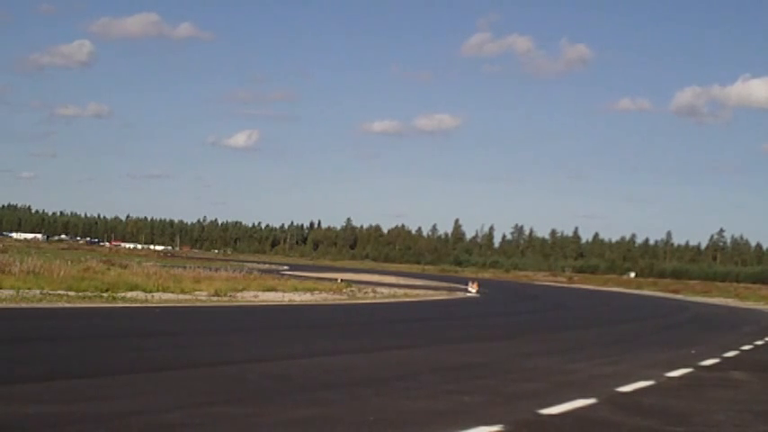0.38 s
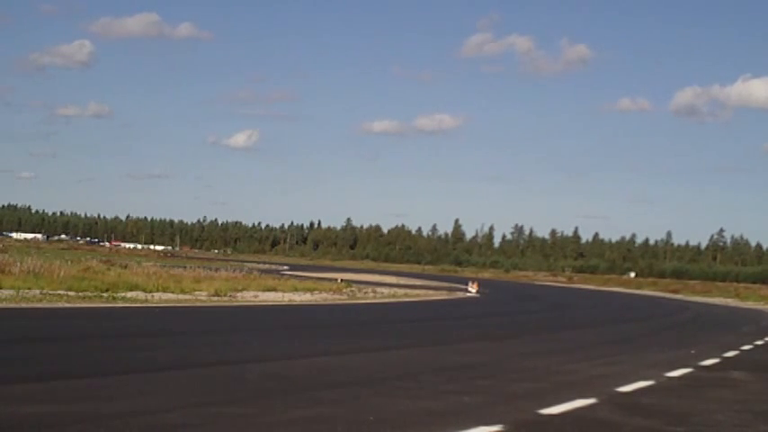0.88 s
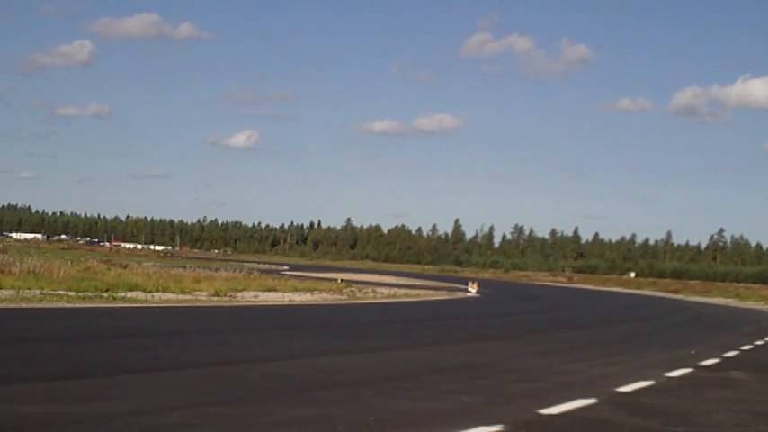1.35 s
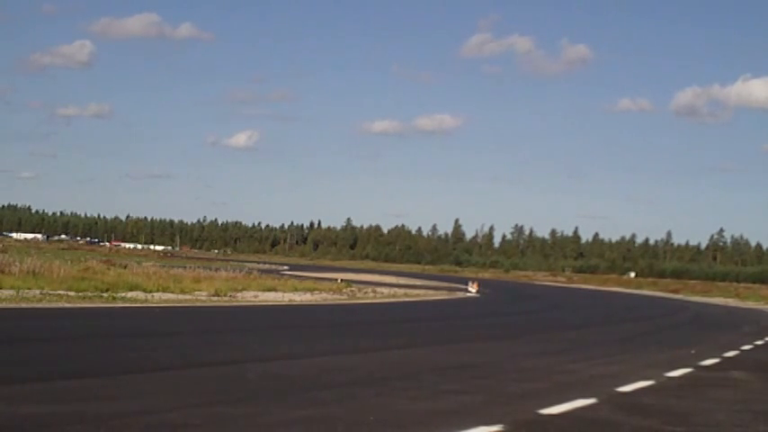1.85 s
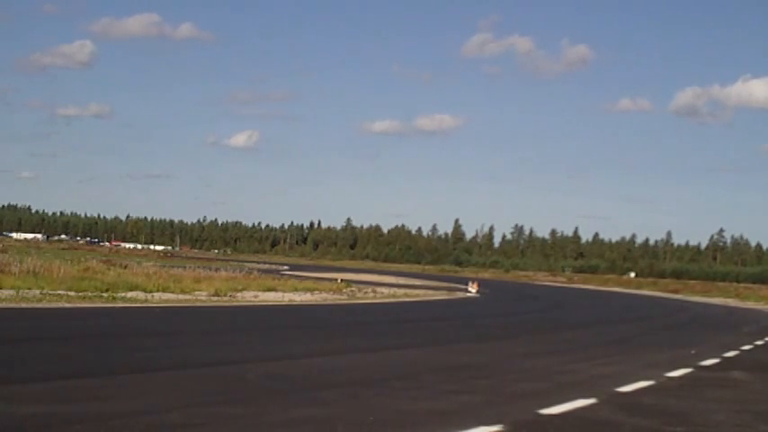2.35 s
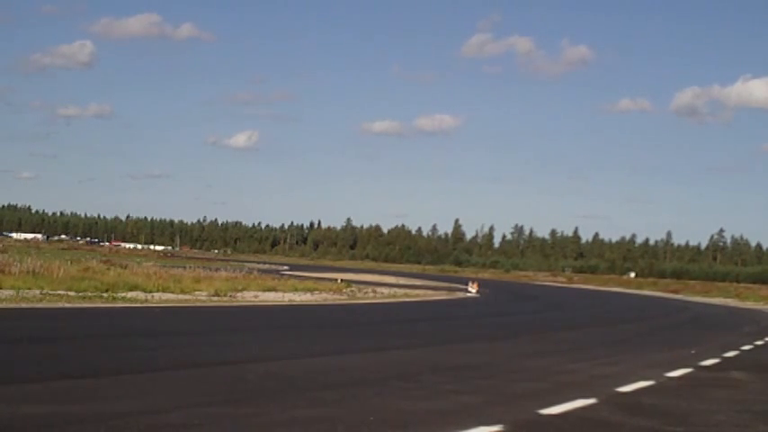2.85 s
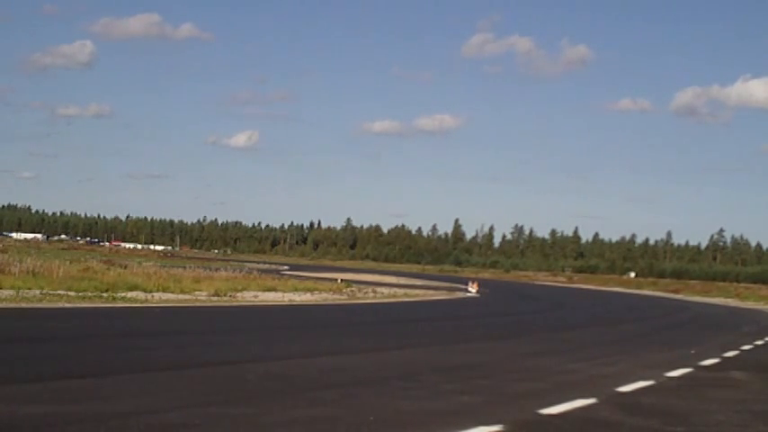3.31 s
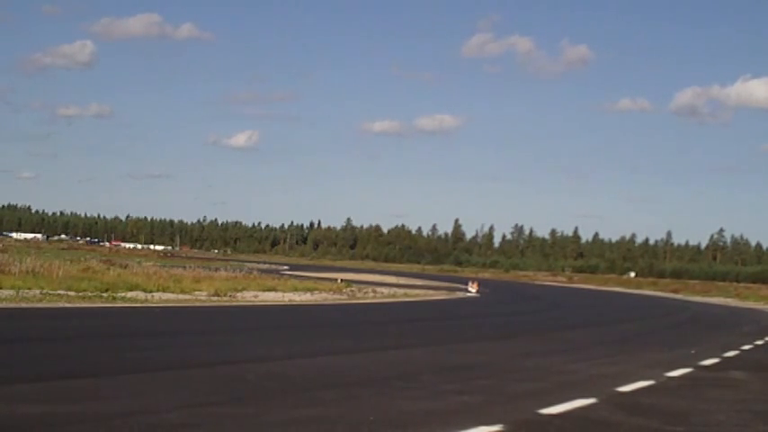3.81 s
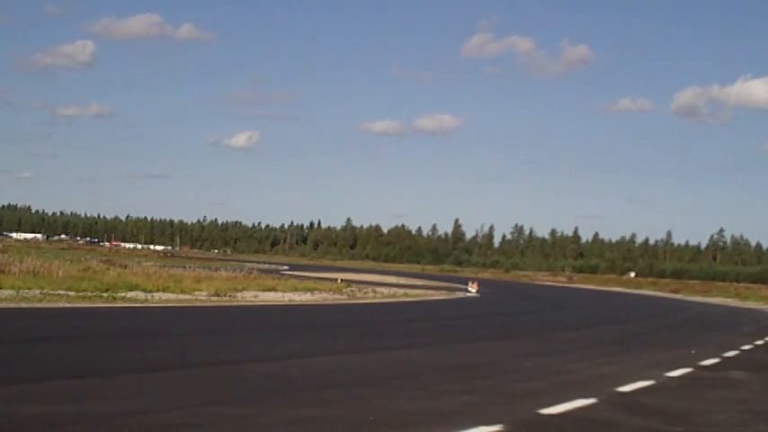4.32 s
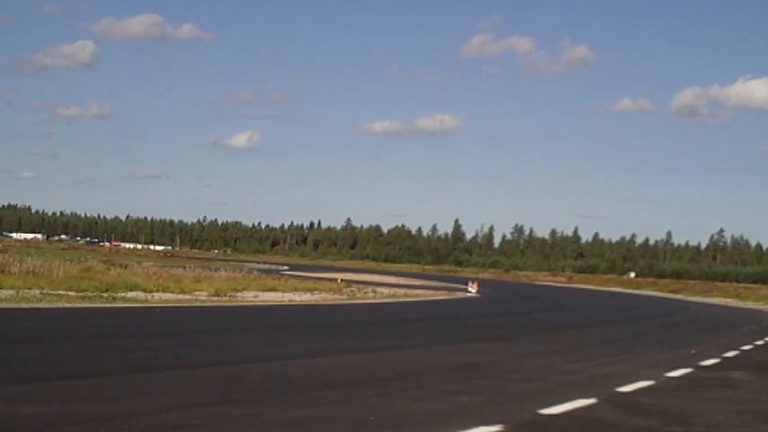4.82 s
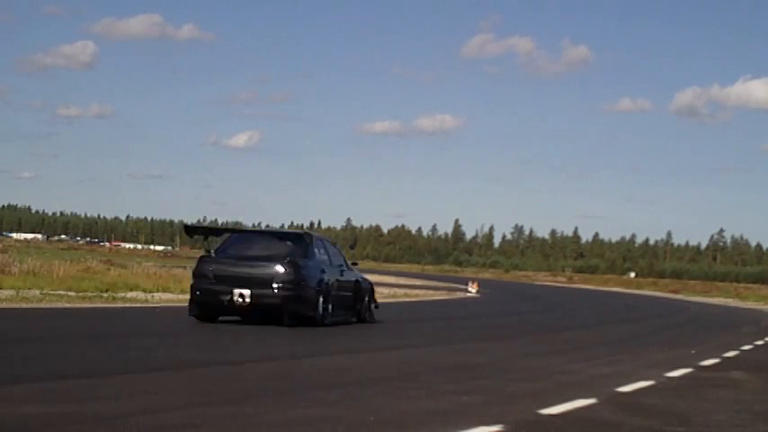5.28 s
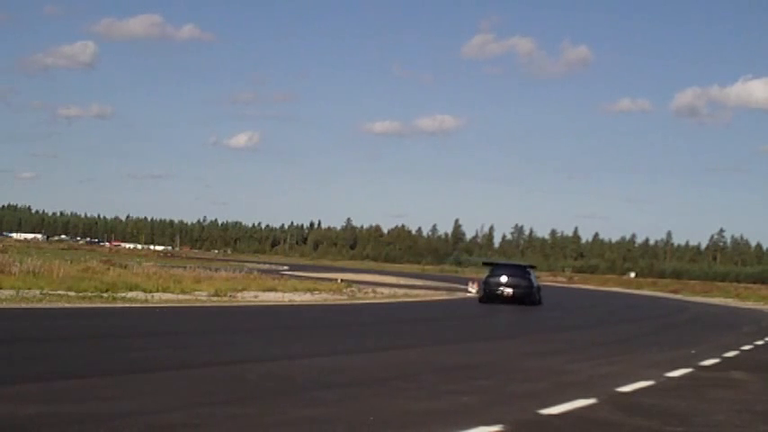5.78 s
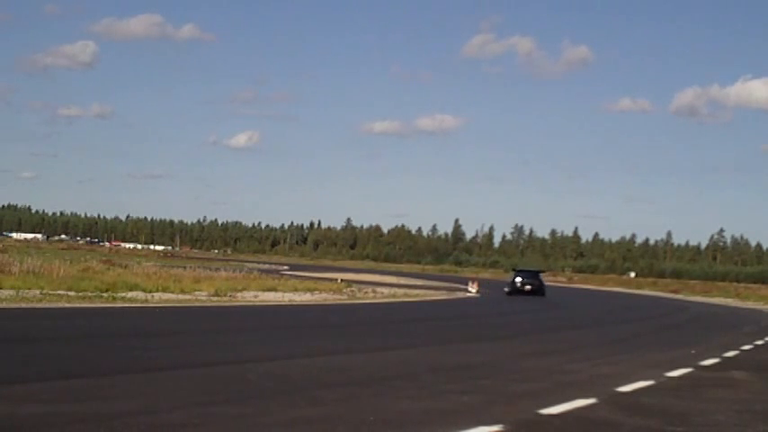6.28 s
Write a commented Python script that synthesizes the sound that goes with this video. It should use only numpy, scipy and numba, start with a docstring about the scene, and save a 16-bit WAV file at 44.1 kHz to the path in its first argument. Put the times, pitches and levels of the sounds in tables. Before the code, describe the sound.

Faint low background in open air, one fixed small microphone. Distant slide: soft exhaust pops and a wavering squeal. Then a turbocharged engine swells, changes up with a pop, releases a chuffing flutter off the throttle, and sweeps by as a distorted whoosh of tyres and air. The departing engine sounds lower and raspier, with sharp cracks, and fades steadily.

```python
"""Turbocharged race car passing a trackside spot

Far off another car slides and pops: resonant noise bursts, narrow squeals and coloured noise.
A four-cylinder car then pulls, shifts up, lifts with a fluttering valve, sweeps past and drives away with
bright crackles: sines at orders of a firing rate that falls by Doppler shift, with filtered noise for
exhaust, tyres and air. A small microphone overloads as the car passes."""
import sys
import numpy as np
from scipy import signal
from scipy.fft import rfft, irfft, next_fast_len
from scipy.io import wavfile
from scipy.ndimage import uniform_filter1d
from numba import njit

SR = 44100
rng = np.random.default_rng(int(sys.argv[2]) if len(sys.argv) > 2 else 0)


def volts(x):
    """Linear amplitude factor 10**(x/20) for a level x in dB, scalar or array-like."""
    e = np.asarray(x, float) / 20
    return 10 ** e


def output_pcm(signal):
    """Save a mono or channel-first signal as 16-bit PCM at the path in sys.argv[1].

    Samples are clipped to [-1, 1] before scaling.
    """
    pcm = np.clip(np.atleast_2d(signal).T, -1, 1) * 32767
    wavfile.write(sys.argv[1], SR, np.round(pcm).astype(np.int16))


N = 293265

PASSING_S, TURN_S = 4.93, 0.011            # the car goes by
LIFT_S, LIFT_TAKES_S = 3.76, 0.015         # the throttle closes
TAILPIPE_S, TAILPIPE_TAKES_S = 4.76, 0.03  # the tailpipe comes into earshot


def rms_one(x):
    """Normalisation: scale to an rms of 1."""
    return x / np.sqrt(np.mean(x ** 2) + 1e-20)


def in_time(rows):
    """Linear interpolation: the columns of a timed table, read at every sample."""
    s, *columns = np.transpose(rows)
    return [np.interp(np.arange(N) / SR, s, column) for column in columns]


def drift(rate_hz):
    """Low-passed white noise: slow wander of rms 1, smoothed by a double pole at rate_hz."""
    hop = 40  # samples between control points
    r = np.exp(-2 * np.pi * hop * rate_hz / SR)
    settle = 2000
    noise = rng.standard_normal(N // hop + settle + 2)
    slow = signal.lfilter([1], [1, -2 * r, r * r], noise)[settle:]
    return np.interp(np.arange(N) / hop, np.arange(len(slow)), rms_one(slow))


def coloured(x, spectrum):
    """Spectral shaping: weight the Fourier bins of x by the spectrum, then scale to rms 1."""
    hz, db = np.transpose(spectrum)
    size = next_fast_len(N)
    log_bins = np.log(np.arange(size // 2 + 1) * SR / size + 1)
    gain = volts(np.interp(log_bins, np.log(hz), db, left=-90, right=-90))
    return rms_one(irfft(rfft(x, size) * gain, size)[:N])


@njit
def resonate(x, hz, width, sr):
    """Two-pole resonance whose centre and width may move; gain 1 at the peak."""
    out = np.zeros(len(x))
    for i in range(2, len(x)):
        r = np.exp(-np.pi * width[i] / sr)
        drive = (1 - r * r) / 2 * (x[i] - x[i - 2])
        out[i] = drive + 2 * r * np.cos(2 * np.pi * hz[i] / sr) * out[i - 1] - r * r * out[i - 2]
    return out


def resonate_fixed(x, hz, width):
    """Two-pole resonance at rest: constant centre and width in Hz."""
    return resonate(x, np.full(len(x), hz), np.full(len(x), width), SR)


def filtered(x, order, hz, kind="low"):
    """Butterworth filtering: a maximally flat passband."""
    return signal.sosfilt(signal.butter(order, hz, kind, fs=SR, output="sos"), x)


def after(s, takes_s):
    """Smooth transition: a hyperbolic-tangent step from 0 to 1."""
    return .5 + .5 * np.tanh((np.arange(N) / SR - s) / takes_s)


def blend(pair, share):
    """Linear crossfade: from the first value to the second as share goes from 0 to 1."""
    return pair[0] + share * (pair[1] - pair[0])


def facing_tail():
    """Directivity switch: 0 while the car approaches, 1 once it has gone by."""
    return after(PASSING_S, TURN_S)


def two_sided(x, spectra):
    """Source directivity: an equal-power change from the nose spectrum to the tail spectrum."""
    tail = facing_tail()
    return np.sqrt(1 - tail) * coloured(x, spectra[0]) + np.sqrt(tail) * coloured(x[::-1], spectra[1])


def resonance_lift_db(line_hz, resonances):
    """Resonance curve: Lorentzian lifts in dB for a line that moves in frequency."""
    return sum(db / (1 + (2 * (line_hz - hz) / width) ** 2) for hz, width, db in resonances)


# spectrum shape of the microphone's hiss: frequency_hz, relative_level_db (per Hz)
SELF_NOISE = [(250, -9.5), (6000, -5.5), (9000, -9.5), (13000, 0.5), (16000, -6)]


def self_noise():
    """Stationary noise floor: coloured random noise at -78 dB rms."""
    return volts(-78) * coloured(rng.standard_normal(N), SELF_NOISE)


# spectrum shape of the circuit's hum: frequency_hz, relative_level_db (per Hz)
FAR_TRACK = [(22, -19), (50, -12.5), (100, -5), (200, 0.5), (300, -1), (450, -15)]


def far_track():
    """Distant diffuse sound: low coloured noise whose level wanders slightly."""
    return volts(-53.5 + 2 * drift(9.2)) * coloured(rng.standard_normal(N), FAR_TRACK)


# tyre squeal of the far car, one list per tone: time_s, pitch_hz, level_db (rms)
SQUEAL_TONES = [
    [(.05, 2070, -55), (.2, 2075, -52), (.4, 2080, -50), (.5, 2090, -40), (.62, 2090, -39),
     (.75, 2085, -43), (.85, 2080, -54)],
    [(.7, 1200, -53), (.8, 1210, -48), (.92, 1225, -47), (1.08, 1230, -55)],
]


def squeal():
    """Stick-slip friction of rubber: noise through 15 Hz wide resonances gives wavering narrow tones."""
    out, now = np.zeros(N), np.arange(N) / SR
    for rows in SQUEAL_TONES:
        hz, db = in_time(rows)
        fade = np.clip(np.minimum(now - rows[0][0], rows[-1][0] - now) / 0.062, 0, 1)
        tone = resonate(rng.standard_normal(N), hz, np.full(N, 15), SR)
        out += fade * volts(db) * rms_one(tone)
    return out


# low thumps on the microphone: centre_s, level_db (rms at the centre), decay_s (to 1/e on either side)
GUSTS = [(3.91, -40, 0.012), (4.916, -38.5, 0.033)]


def gusts():
    """Wind pressure on the microphone: pushed air thumps as noise between 30 and 130 Hz."""
    now = np.arange(N) / SR
    low = rms_one(filtered(rng.standard_normal(N), 2, [30, 130], "band"))
    return low * sum(volts(db) * np.exp(-np.abs(now - s) / decay) for s, db, decay in GUSTS)


def bursts(events, sharpness, attack_s, bright_db):
    """Impulsive excitation of a resonator: each event is a dying noise burst through a resonance."""
    out, age = np.zeros(N), np.arange(SR // 4) / SR
    for s, db, hz, decay_s in events:
        burst = rng.standard_normal(len(age)) * (1 - np.exp(-age / attack_s)) * np.exp(-age / decay_s)
        rung = resonate_fixed(resonate_fixed(burst, hz, hz / sharpness), hz, hz / sharpness)
        rung = filtered(rung, 4, 3 * hz)  # far air dulls it
        rung += volts(bright_db) * filtered(burst, 4, 10500)  # a little of the burst bypasses the resonance
        at = round(s * SR)
        out[at:at + len(age)] += volts(db) * rung / np.abs(rung).max()
    return out


# exhaust pops: start_s, level_db (peak), ring_hz, t60_s
POPS = [(.001, -24, 500, .1), (.197, -29, 500, .2), (.347, -28, 600, .12), (.55, -21, 580, .2),
        (.62, -25, 430, .12), (.72, -27, 600, .1), (.78, -27, 440, .1), (2.893, -13.5, 700, .06),
        (3.7, -18, 630, .08), (3.794, -18, 620, .07), (3.848, -20, 600, .07), (3.909, -17, 350, .05)]


def exhaust_pops():
    """Strongly damped pipe resonance: short bursts with a broad ring."""
    events = [(s, db, hz, t60 / np.log(1000)) for s, db, hz, t60 in POPS]
    return bursts(events, sharpness=1, attack_s=.0015, bright_db=-90)


# valve flutter at the lift, then bright crackles from behind:
# start_s, level_db (peak), centre_hz, decay_s (of the noise, to 1/e)
FLUTTER_AND_CRACKLES = [(3.697, -8, 1910, .022), (3.76, -13, 2020, .018), (3.843, -15.5, 1900, .015),
                        (3.924, -18.5, 2010, .01), (5.193, -4.5, 2790, 0.014), (5.38, -8, 2770, 0.017),
                        (5.445, -16.5, 2800, .015), (5.522, -9, 2680, 0.024), (5.585, -9.5, 2930, 0.013)]


def flutter_and_crackles():
    """Lightly damped resonance: valve puffs and later crackles ring at a clearer pitch."""
    return bursts(FLUTTER_AND_CRACKLES, sharpness=3.5, attack_s=.003, bright_db=-60)


# far car: time_s, rumble_db, roar_db, roar_centre_hz, rasp_db (before each source's own trim and flicker)
FAR_CAR = [(.04, -29, -41.5, 1470, -54), (.09, -63, -41, 1510, -53), (.17, -39, -40, 1520, -53),
           (.22, -34.5, -40.5, 1520, -46.5), (.36, -32, -40.5, 1530, -52), (.48, -41.5, -35.5, 1760, -41),
           (.57, -27, -34.5, 1630, -38), (.78, -30.5, -37, 1450, -49), (.87, -33.5, -40.5, 1240, -47),
           (.98, -34, -41.5, 1240, -48.5), (1.04, -37.5, -44.5, 1220, -55)]
# passing car: time_s, roar_db, rasp_db, hiss_db, rush_db (before each source's own trim and flicker)
CAR = [(1.23, -42.5, -58.5, -70, -86), (1.5, -38, -52.5, -62.5, -85), (1.65, -37.5, -49.5, -63, -85.5),
       (1.9, -32.5, -56.5, -61, -83), (2.3, -29, -57.5, -62, -80), (2.84, -32, -59, -65.5, -82),
       (3.07, -26, -38.5, -59.5, -79), (3.35, -25.5, -37.5, -60, -68), (3.65, -23.5, -35.5, -58, -71),
       (3.75, -23.5, -36.5, -54, -64), (3.97, -26, -33.5, -56, -62.5), (4.13, -23, -34.5, -49, -62),
       (4.3, -22.5, -33, -48, -59), (4.52, -14.5, -28, -41.5, -52), (4.62, -9.5, -29, -40, -40.5),
       (4.72, -9.5, -33, -33, -38), (4.9, -9, -20.5, -26.5, -39.5), (5.01, -10.5, -11.5, -24, -38),
       (5.11, -10, -12, -27, -42.5), (5.23, -14.5, -13.5, -32, -48), (5.33, -15, -18, -41, -52.5),
       (5.58, -17, -20, -45.5, -55.5), (5.66, -23, -24.5, -47.5, -60), (6.08, -23.5, -25.5, -50, -64.5),
       (6.3, -25.5, -28, -50, -67), (6.63, -32.5, -32.5, -53.5, -69)]
SPEED_M_S, NEAREST_M = 57, 6
# rumble level is an offset for pulling, coasting and tail, plus a share of the roar's level in dB
RUMBLE_OFFSET_DB, RUMBLE_SHARE = (-19.5, -17.5, -19), 0.46
# roar centre extrapolated to distance 0 and its fall with distance (negative: rise): nose, tail
ROAR_HZ, ROAR_FALL_HZ_PER_M = (1660, 1167), (2.9, -0.45)


def noise_controls():
    """Distance law: the far car's levels, then the passing car's, with a roar centre that depends on distance."""
    now, tail = np.arange(N) / SR, facing_tail()
    metres = np.hypot(NEAREST_M, SPEED_M_S * (now - PASSING_S))
    far_rumble_db, far_roar_db, far_roar_hz, far_rasp_db = in_time(FAR_CAR)
    roar_db, rasp_db, hiss_db, rush_db = in_time(CAR)
    near = np.interp(now, [FAR_CAR[-1][0], CAR[0][0]], [0, 1])
    nose_offset_db = blend(RUMBLE_OFFSET_DB, after(LIFT_S, LIFT_TAKES_S))
    rumble_db = blend((nose_offset_db, RUMBLE_OFFSET_DB[2]), tail) + RUMBLE_SHARE * roar_db
    roar_hz = blend(ROAR_HZ, tail) - blend(ROAR_FALL_HZ_PER_M, tail) * metres
    far_hiss_db = far_rasp_db - 23.5
    return (blend((far_rumble_db, rumble_db), near), blend((far_roar_db, roar_db), near),
            blend((far_roar_hz, roar_hz), near), blend((far_rasp_db, rasp_db), near),
            blend((far_hiss_db, hiss_db), near), rush_db)


# spectrum shape of the exhaust rumble: frequency_hz, relative_level_db (per Hz)
RUMBLE = [(40, -59.5), (100, -16), (200, -4.5), (330, 4), (600, 5), (850, -3), (1200, -13), (2000, -28)]


def exhaust_rumble(rumble_db, throb):
    """Amplitude modulation: low exhaust noise throbs with the firings."""
    return volts(rumble_db - 5.5 + drift(19)) * coloured(rng.standard_normal(N) * throb, RUMBLE)


def tyre_roar(roar_db, roar_hz):
    """Broad moving resonance: tyre noise in one hump, evened out in level and band-limited per side."""
    hump = resonate(rng.standard_normal(N), roar_hz, 1.15 * roar_hz, SR)
    nose, rear = (filtered(hump, 4, [250, top_hz], "band") for top_hz in (2080, 2270))
    hump = blend((nose, rear), facing_tail())
    running_rms = np.sqrt(uniform_filter1d(hump ** 2, size=8000))
    return volts(roar_db + 0.9 * drift(29)) * hump / running_rms


# spectrum shapes of the exhaust rasp, nose list then tail list: frequency_hz, relative_level_db (per Hz)
RASP = ([(1900, -8.5), (2300, -0.5), (2700, 1.5), (3100, -1.5), (3400, -9.5), (3750, -22.5), (4400, -29)],
        [(1700, -28.5), (2100, -8), (2400, 1), (2850, 3.5), (3300, -2), (3800, -11), (4300, -19.5),
        (4700, -39.5)])


def exhaust_rasp(rasp_db, throb, gusty):
    """Amplitude modulation and directivity: throbbing noise whose colour depends on the side heard."""
    return volts(rasp_db + .5 * gusty + 0.94 * drift(22)) * throb * two_sided(rng.standard_normal(N), RASP)


def tail_hollow(x):
    """Notch by subtraction: from behind, a gap is heard between roar and rasp."""
    hz, width_hz, depth = 2110, 120, 0.58
    return x - depth * facing_tail() * resonate_fixed(x, hz, width_hz)


# whoosh that falls as the car goes by: time_s, centre_hz, level_db (rms of the upper band before the low-pass)
WHOOSH = [(4.3, 1890, -55), (4.55, 1870, -28.5), (4.65, 1803, -13.5), (4.75, 1648, -8.5),
          (4.85, 1470, -6.5), (4.93, 1396, -9.5), (5.0, 1247, -22.5), (5.15, 1150, -56.5)]


def whoosh():
    """Gliding narrow-band noise: a resonance that falls in pitch, with a weaker band beneath it."""
    hz, db = in_time(WHOOSH)
    white = rng.standard_normal(N)
    upper = resonate(resonate(white, hz, 0.14 * hz, SR), hz, 0.14 * hz, SR)
    lower = resonate(white[::-1].copy(), 0.653 * hz, 0.144 * hz, SR)
    sounding = db > WHOOSH[0][2]
    return filtered(volts(db) * (rms_one(upper) + volts(-3.5) * rms_one(lower)) * sounding, 2, 5000)


# spectrum shapes of the hiss, nose list then tail list: frequency_hz, relative_level_db (per Hz)
HISS = ([(3300, -25), (3850, -9), (4300, 0), (4700, -7), (5400, -9), (5900, -17), (7000, -32)],
        [(3300, -25), (3900, 0), (4500, -6), (5000, -3), (5500, -6), (6000, -14), (7000, -30)])


def car_hiss(hiss_db, throb, gusty):
    """Amplitude modulation and directivity: a throbbing hiss above the rasp."""
    return volts(hiss_db + .5 * gusty + 0.78 * drift(23)) * throb * two_sided(rng.standard_normal(N), HISS)


# spectrum shapes of the air rush, nose list then tail list: frequency_hz, relative_level_db (per Hz)
RUSH = ([(4500, -23.5), (6000, -3.5), (7000, 3), (9000, 1.5), (11300, -1.5), (12500, -19), (14000, -38)],
        [(4500, -25.5), (6000, -3), (7000, 4.5), (9000, -2), (11300, -7.5), (12500, -16.5), (14000, -42.5)])
# spectrum shape of its highest band: frequency_hz, relative_level_db (per Hz)
TOP = [(9000, -27.5), (11000, -9), (12500, 5), (14700, -3.5), (16000, -5)]


def air_rush(rush_db, throb, gusty):
    """Atmospheric absorption: the highest band of the rush weakens faster with distance than the rest."""
    flicker_db = 0.45 * gusty + .8 * drift(30)
    rush = volts(rush_db + 5 + flicker_db) * two_sided(rng.standard_normal(N), RUSH) * throb
    top_db = rush_db - 5.5 + 0.26 * (rush_db + 31)  # 1.26 dB for each dB of the rush
    top = volts(top_db + flicker_db) * coloured(rng.standard_normal(N) * throb, TOP)
    return rush + top


def road_noise(turns):
    """Superposition of noise sources: exhaust, tyres and air, mostly throbbing with firings and whole cycles."""
    rumble_db, roar_db, roar_hz, rasp_db, hiss_db, rush_db = noise_controls()
    throb = 1 + 0.12 * np.cos(2 * np.pi * turns) + 0.04 * np.cos(np.pi / 2 * turns)
    gusty = drift(31)  # a flicker shared by the treble sources
    mid = tail_hollow(tyre_roar(roar_db, roar_hz) + exhaust_rasp(rasp_db, throb, gusty))
    treble = car_hiss(hiss_db, throb, gusty) + air_rush(rush_db, throb, gusty)
    return exhaust_rumble(rumble_db, throb) + mid + whoosh() + treble


# firing rate as heard (pull, upshift, pull, coasting, Doppler fall, steady departure): time_s, firing_hz
FIRING = [(1.3, 222.3), (1.76, 234.7), (2.83, 262.4), (2.87, 262.5), (2.93, 232.3), (3.0, 225.7),
          (3.16, 229.8), (3.64, 239.3), (3.725, 238.7), (4.2, 234.4), (4.55, 233.8), (4.7, 230.8),
          (4.79, 221.5), (4.87, 218.3), (4.92, 209.8), (4.98, 194.5), (5.04, 181.8), (5.1, 172.1),
          (5.21, 169.9), (5.44, 167.5), (6.0, 166.9), (6.62, 167.8)]


def firing_rate():
    """Doppler effect: the firing rate as it reaches the listener, in Hz."""
    return in_time(FIRING)[0]


# low orders over the engine note: order, pulling_db, coasting_db, tailpipe_db (before resonances and trims)
LOW_ORDERS = [(1, -11, 1.5, 7), (1.75, -6, 3.5, 6), (2, 8, 6.5, 16), (3, -3.5, 10, 13.5)]
# pipe resonances that lift the low orders: centre_hz, width_hz, lift_db
PIPE = [(252.5, 18, 7.5), (612, 68, 11.5), (759, 45, 16)]
UPSHIFT_S, HIGHER_GEAR_DB = 2.95, 3.5
SWELL_DB_PER_S = 1


def low_order_levels(firing_hz, note_db):
    """Source and filter: throttle, the side that faces us and pipe resonances set each low order."""
    now = np.arange(N) / SR
    lifted, tailpipe = after(LIFT_S, LIFT_TAKES_S), after(TAILPIPE_S, TAILPIPE_TAKES_S)
    levels = []
    for order, pulling_db, coasting_db, tailpipe_db in LOW_ORDERS:
        uneven_db = coasting_db + 3 * drift(13)  # off the throttle the firing is uneven
        nose_db = blend((pulling_db, uneven_db), lifted)
        side_db = blend((nose_db, tailpipe_db), tailpipe)
        levels.append(note_db + side_db + resonance_lift_db(order * firing_hz, PIPE))
    first, odd, second, third = levels
    # the second order is fuller under the load of the higher gear and swells as the car drives off
    second = second + HIGHER_GEAR_DB * (now > UPSHIFT_S) * (1 - lifted)
    second = second + SWELL_DB_PER_S * np.maximum(now - PASSING_S, 0)
    third = third - 14 * np.exp(-((now - 5.66) / 0.11) ** 2)  # the third dips briefly
    return first, odd, second, third


# reference level of the engine note, to which the orders' levels add: time_s, level_db (rms)
NOTE = [(1.3, -62), (1.6, -46), (1.93, -43.5), (2.4, -40.5), (2.81, -40.5), (2.88, -46.5), (3.0, -43.5),
        (3.16, -43.5), (3.72, -41.5), (3.8, -58), (4.3, -50), (4.7, -38), (5.1, -36.5), (5.44, -42),
        (5.7, -43.5), (6.1, -43), (6.62, -40)]
# unequal cylinders give lines at quarters of the firing rate: order, nose_db, tail_db (over the note)
UPPER_ORDERS = [(.75, -30, -17), (1.25, -10, -11), (1.5, -20, -9), (2.25, -8, -3), (2.5, -3, 3),
                (2.75, -9, -6), (3.25, -9, -5), (3.5, -3, 3), (3.75, -5, -7), (4, -6, 0), (4.25, -9, -12),
                (4.5, -7, -6), (4.75, -6, -6), (5, -3, 1), (5.25, -10, -12), (5.5, -5, -5), (5.75, -2, -6),
                (6, -9, 0), (6.25, -9, -12), (6.5, -3, -12), (6.75, -7, -12), (7, -6, -4), (7.5, -7, -15),
                (8, -10, -15), (8.75, -11, -18), (10, -13, -20)]
# intake resonances heard on the nose side: centre_hz, width_hz, lift_db
INTAKE = [(935, 130, 7), (1220, 170, 7.5), (1472, 94, 10), (2506, 67, 0.5)]


def engine_tones(firing_hz, turns):
    """Additive synthesis of engine orders: clean low sines; upper orders fade in and out over the air path."""
    (note_db,) = in_time(NOTE)
    out, tail = np.zeros(N), facing_tail()
    for order, db in zip((1, 7 / 4, 2, 3), low_order_levels(firing_hz, note_db)):
        out += volts(db + 0.27 * drift(7)) * np.sin(2 * np.pi * order * turns)
    for order, nose_db, tail_db in UPPER_ORDERS:
        lift_db = resonance_lift_db(order * firing_hz, INTAKE)
        db = note_db + blend((nose_db + lift_db, tail_db), tail) + 2 * drift(1.3)
        phase = order * turns + rng.random() + .03 * drift(8)  # in turns
        out += volts(db) * np.sin(2 * np.pi * phase)
    sounding = np.arange(N) > NOTE[0][0] * SR
    return np.sqrt(2) * out * sounding  # sines of rms 1 at 0 dB


def scene():
    """Linear superposition: all sources add in one channel."""
    firing_hz = firing_rate()
    turns = np.cumsum(firing_hz) / SR  # firings so far
    background = far_track() + squeal() + gusts()
    short_sounds = exhaust_pops() + flutter_and_crackles()
    car = road_noise(turns) + engine_tones(firing_hz, turns)
    return (background + short_sounds + car)[None]


# fixed gaps in the treble near 6, 8 and 10 kHz: centre_hz, width_hz, depth (0 to 1)
TREBLE_GAPS = [(5950, 1400, 0.8), (7950, 1320, 0.98), (10060, 1200, 0.96)]


def treble_gaps(x):
    """Notches by subtraction: each band is taken out of the sound by its own resonance."""
    for hz, width_hz, depth in TREBLE_GAPS:
        x = x - np.clip(depth, 0, 1) * resonate_fixed(x, hz, width_hz)
    return x


def input_stage(x):
    """Nonlinear saturation: peaks bend towards 1.2, the bass is cut below 60 Hz, then full scale clips."""
    x = x / (1 + (x / 1.2) ** 4) ** (1 / 4)
    return np.clip(filtered(x, 2, 60, "high"), -1, 1)


def top_cut(x):
    """Nothing passes above the cut-off."""
    return signal.sosfilt(signal.butter(12, 15520, fs=SR, output="sos"), x)


def record(dry):
    """Transducer chain: a faint hiss, fixed treble gaps and an input stage that overloads."""
    heard = treble_gaps(dry[0] + self_noise())
    mix = input_stage(heard)[None]
    return top_cut(mix)


dry = scene()
out = record(dry)
output_pcm(out)
```